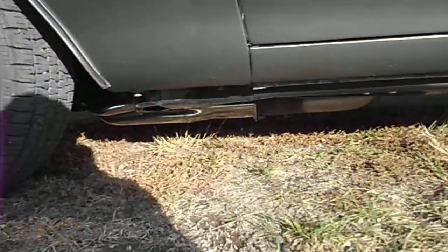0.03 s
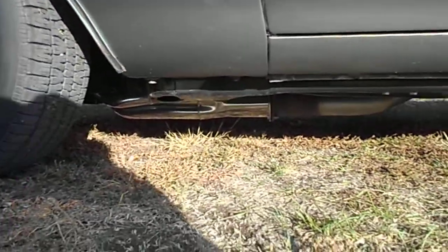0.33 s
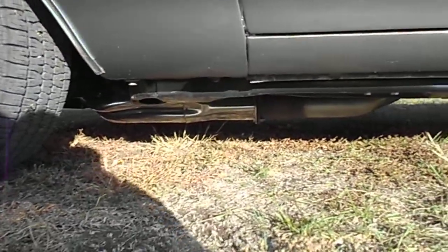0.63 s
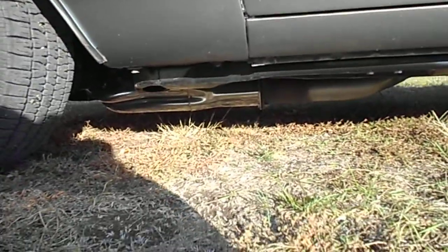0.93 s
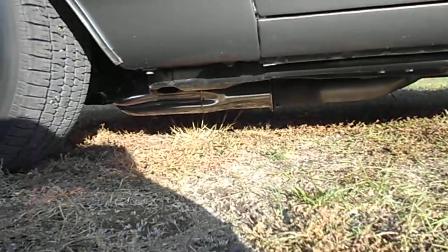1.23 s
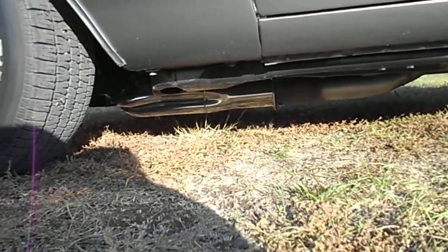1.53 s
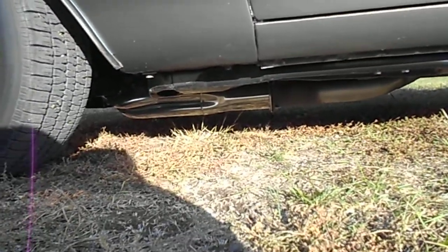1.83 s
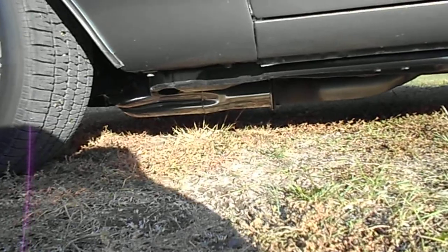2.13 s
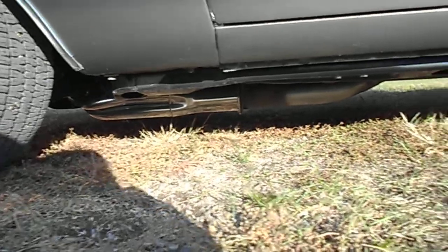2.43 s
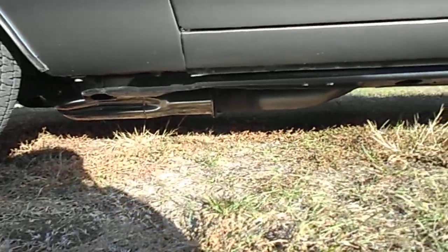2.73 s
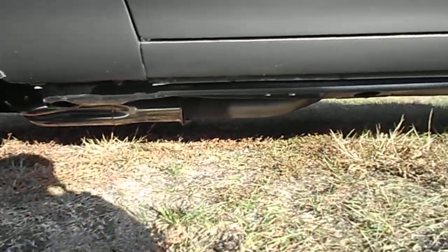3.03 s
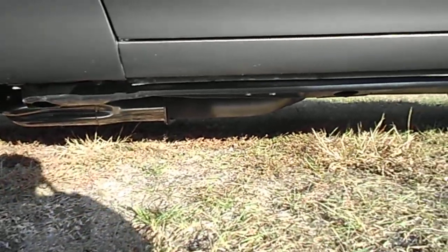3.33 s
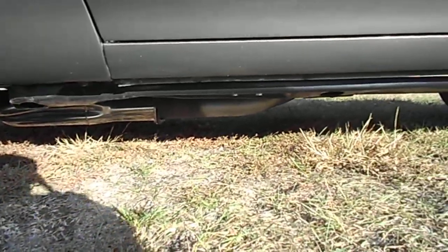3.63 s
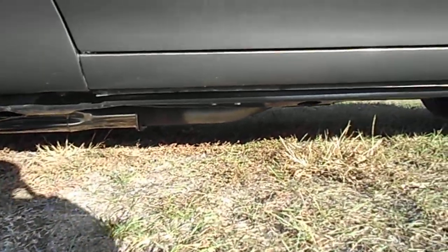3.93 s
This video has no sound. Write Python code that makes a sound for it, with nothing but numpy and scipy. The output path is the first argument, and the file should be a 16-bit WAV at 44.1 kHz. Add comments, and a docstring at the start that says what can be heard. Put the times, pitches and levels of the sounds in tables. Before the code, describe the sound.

A V8 car idles outdoors with a deep, lumpy beat, its exhaust close to the microphone. The pipe booms and burbles throughout over a low rumble, while loose thin metal rattles in short, sizzling bursts.

```python
"""A V8 car idles with a lumpy beat on grass, its side exhaust close to the microphone.
Uneven firings boom through the pipe, each with a puff of gas that burbles and rushes out.
Something of thin metal, probably a loose shield, rattles in short sizzling bursts as the
engine shakes, and now and then sings a note. A deep rumble swells under the car."""
import sys
import numpy as np
from scipy import signal
from scipy.io import wavfile
from scipy.ndimage import uniform_filter1d

SR = 44100
rng = np.random.default_rng(int(sys.argv[2]) if len(sys.argv) > 2 else 0)


def transcribe(signal):
    """Save signal, clipped to [-1, 1], as a 16-bit WAV file at the path in sys.argv[1]."""
    frames = np.atleast_2d(signal).T
    limited = np.clip(frames, -1, 1)
    pcm = np.round(limited * 32767).astype(np.int16)
    wavfile.write(sys.argv[1], SR, pcm)


N = 176400  # 4 seconds


def amp(db):
    """Turns decibels into a gain."""
    return 10 ** (np.asarray(db) / 20)


def unit(x):
    """Scales a sound to an average (rms) level of 1."""
    return x / np.sqrt(np.mean(x ** 2) + 1e-20)


def curve(table):
    """Joins rows of (seconds, value) with straight lines, giving a value for every sample."""
    times, values = np.transpose(table)
    return np.interp(np.arange(N) / SR, times, values)


def colour(x, points):
    """Shapes the tone with a filter that follows rows of (Hz, dB)."""
    hz, db = np.transpose(points)
    bins_hz = abs(np.fft.fftfreq(16384, 1 / SR))
    log_gain = np.log(amp(np.interp(np.log(bins_hz + 1), np.log(hz), db)))
    taps = np.fft.ifft(np.exp(np.conj(signal.hilbert(log_gain)))).real  # rings only after a hit
    return signal.fftconvolve(x, taps[:len(taps) // 2])[:N]


def with_modes(x, modes):
    """Adds ringing tones (resonances) to a sound, from rows of (Hz, width in Hz, dB)."""
    out = x
    for hz, width, db in modes:
        decay = np.exp(-np.pi * width / SR)
        pole = decay * np.exp(2j * np.pi * hz / SR)
        out = out + 2 * amp(db) * signal.lfilter([1 - decay], [1, -pole], x).real
    return out


def resonate(x, hz, width_hz):
    """One resonance whose pitch follows the curve hz."""
    turn = np.exp(2j * np.pi * np.cumsum(hz) / SR)
    decay = np.exp(-np.pi * width_hz / SR)
    return 2 * (turn * signal.lfilter([1 - decay], [1, -decay], x / turn)).real


def steadied(x, samples):
    """Evens out slow drift in loudness, so that a level curve can set it."""
    window = np.hanning(samples)
    local_power = abs(signal.fftconvolve(x ** 2, window / window.sum(), "same"))
    return x / np.sqrt(local_power + np.mean(x ** 2) / 20)


# The tone of the rumble. Each row: frequency in Hz, gain in dB.
RUMBLE_TONE = [(15, -37), (36, -20.5), (48, -5.5), (58, -4.5), (80, -5), (130, -27), (400, -64.5)]
# The swells of the rumble. Each row: time in seconds, level in dB.
RUMBLE_SWELLS = [(0, -27), (1.0, -31.5), (1.95, -24.5), (2.13, -38), (2.29, -24.5), (2.36, -32),
                 (3.15, -31), (3.4, -30), (3.53, -42.5), (3.7, -22.5), (3.8, -33.5)]
def rumble():
    """Deep noise swells and sinks under the car."""
    noise = colour(rng.standard_normal(N), RUMBLE_TONE)
    return steadied(noise, samples=6000) * amp(curve(RUMBLE_SWELLS))


# The jolts that rattle the metal. Each row: start in seconds, strength in dB.
JOLTS = [(0.0094, -40), (0.0648, -37.5), (0.1694, -29), (0.224, -30.5), (0.4675, -37.5), (0.4907, -38.5),
         (0.577, -33), (0.588, -31), (0.6412, -36.5), (0.6757, -36.5), (0.9087, -34.5), (0.928, -33.5),
         (0.974, -37), (1.009, -29.5), (1.13, -37), (1.1837, -37), (1.201, -29), (1.287, -38.5),
         (1.377, -34.5), (1.418, -38), (1.472, -36.5), (1.491, -29.5), (1.532, -38), (1.5811, -29),
         (1.619, -35), (1.6727, -31.5), (1.7144, -36), (1.762, -38.5), (1.7814, -26), (1.866, -28.5),
         (1.897, -31), (1.95, -30.5), (2.186, -38), (2.2048, -32), (2.2635, -39.5), (2.297, -29.5),
         (2.335, -31.5), (2.38, -32.5), (2.4773, -34), (2.5955, -36.5), (2.699, -33), (2.7901, -36.5),
         (2.8983, -29), (3.02, -34.5), (3.0749, -38), (3.1294, -30.5), (3.302, -33.5), (3.349, -34),
         (3.4, -37.5), (3.6377, -40), (3.68, -37.5), (3.692, -35), (3.7298, -35), (3.759, -36.5)]
def shaking():
    """How hard the metal shakes: a faint buzz, a burst at each jolt, and small random spits."""
    rise_s, hold_s, burst_fall_s, buzz_db = 0.0014, 0.0095, 0.019, -49.5
    spits_per_s, spit_db, spit_fall_s = 31, -39.5, 0.0082
    age = np.arange(SR // 4) / SR
    rise = np.minimum(age / rise_s, 1)
    burst = rise * np.exp(-np.maximum(age - hold_s, 0) / burst_fall_s)
    spit = amp(spit_db) * rise * np.exp(-age / spit_fall_s)
    kicks = np.zeros(N)
    for start, db in JOLTS:
        kicks[round(start * SR)] = amp(db)
    touches = (rng.random(N) < spits_per_s / SR).astype(float)
    power = signal.fftconvolve(kicks ** 2, burst ** 2) + signal.fftconvolve(touches, spit ** 2)
    return np.sqrt(amp(buzz_db) ** 2 + abs(power[:N]))


# The notes the loose metal sings. Each row: start in seconds, pitch in Hz, level in dB.
METAL_NOTES = [(0.586, 3200, -55), (1.475, 2470, -58), (1.578, 3150, -48.5), (1.869, 3950, -54),
               (3.135, 3600, -54)]
def metal_chirps():
    """Some jolts make the metal sing: a rough note that slides up and rings out."""
    bend, roughness = 0.11, 0.013  # as fractions of the pitch
    rise_s, fade_60_db_s = 0.0043, 0.31
    age = np.arange(SR // 4) / SR
    settling = np.exp(-age / rise_s)
    out = np.zeros(N)
    for start, hz, db in METAL_NOTES:
        waver = roughness * unit(uniform_filter1d(rng.standard_normal(len(age)), size=100))
        turns = np.cumsum(hz * (1 - bend * settling + waver)) / SR
        note = amp(db - 60 * age / fade_60_db_s) * (1 - settling) * np.sin(2 * np.pi * turns)
        out[round(start * SR):][:len(age)] += note
    return out


# The tone of the metal's bright sizzle. Each row: frequency in Hz, gain in dB.
SIZZLE_TONE = [(2500, -36), (4500, -31), (6500, -20), (8200, -11.5), (9300, -1), (10100, 2.5), (10600, 1),
               (11500, -7.5), (12200, -37)]
# The tone of its lower, longer ring. Each row: frequency in Hz, gain in dB.
RING_TONE = [(1000, -6.5), (1700, -5.5), (2000, -18.5), (2400, -2.5), (2800, -8.5), (3500, -1.5),
             (5000, -12.5), (8000, -9)]
# Its clearest ringing tones. Each row: frequency in Hz, width in Hz, strength in dB.
METAL_MODES = [(2216, 15, 10.5), (2452, 20, 4.5), (3190, 68, 3.5), (3573, 50, 7)]
def metal_rattle(shake):
    """Tiny metal ticks make a bright sizzle and strike a lower, dense ring that lingers."""
    chatter_hz, chatter_depth, ticks_per_s, spread_db = 58.1, 0.12, 4600, 1.5
    sizzle_db, ring_db, fade_60_db_s = -8.5, -18.5, 0.18
    speed = curve(ENGINE_PITCH)  # the chatter speeds up and slows down with the engine
    turns = np.cumsum(chatter_hz * speed / speed.mean()) / SR
    force = shake * unit(np.exp(chatter_depth * (1 - 2 * (turns % 1))))
    ticks = (rng.random(N) < ticks_per_s / SR) * rng.choice([-1, 1], N)
    tick_sizes = amp(spread_db * np.clip(rng.standard_normal(N), -2, 2))
    hits = unit(ticks * tick_sizes) * force
    sizzle = unit(colour(hits, SIZZLE_TONE))
    strike = force ** 1.17  # hard jolts ring the metal more than in proportion
    decay = np.exp(-2 * np.log(1000) / (fade_60_db_s * SR))
    energy = signal.lfilter([1], [1, -decay], strike ** 2)
    lingering = unit(np.sqrt(energy) * rng.standard_normal(N))
    ring = unit(with_modes(colour(0.6 * unit(hits) + lingering, RING_TONE), METAL_MODES))
    return hits.std() * (amp(sizzle_db) * sizzle + amp(ring_db) * ring)


# The tones the pipe rings at. Each row: frequency in Hz, width in Hz, strength in dB.
STANDING_WAVES = [(212, 14.3, 0.5), (293.8, 13.6, 7), (411, 42, -3), (483, 11, 10), (569, 29, -1),
                  (932, 21, -2.5)]
def pipe(x, tone):
    """Gives a sound its tone, then adds the ring of waves bouncing inside the exhaust pipe."""
    return with_modes(colour(x, tone), STANDING_WAVES)


# The tone of the rush. Each row: frequency in Hz, gain in dB.
RUSH_TONE = [(150, -34.5), (350, -2.5), (480, 0), (620, 0), (730, -8), (860, -5), (1040, -4), (1400, -18),
             (2000, -23), (6000, -39.5)]
# How loud the rush is. Each row: time in seconds, level in dB.
RUSH_SWELLS = [(0, -43), (1.1, -45.5), (1.8, -43), (2.1, -46), (2.33, -44), (2.6, -47.5), (4, -45.5)]
def outlet_rush(flow):
    """Gas leaves the end of the pipe with a fairly steady rush."""
    noise = pipe(flow * rng.standard_normal(N), RUSH_TONE)
    return unit(noise) * amp(curve(RUSH_SWELLS))


# The tone of the burble. Each row: frequency in Hz, gain in dB.
BURBLE_TONE = [(50, -31), (110, -4.5), (170, 8.5), (260, -2), (340, -10), (480, -14.5), (2000, -67.5)]
# How loud the burble is. Each row: time in seconds, level in dB.
BURBLE_SWELLS = [(0.02, -31), (0.1, -36), (0.2, -29), (0.36, -37.5), (0.5, -30), (0.92, -35.5),
                 (1.04, -27.5), (1.22, -33.5), (1.27, -26.5), (1.38, -31), (1.59, -30), (1.66, -23.5),
                 (1.78, -33.5), (1.89, -27.5), (2.15, -35.5), (2.36, -27.5), (2.64, -39.5), (2.73, -32.5),
                 (3.4, -36), (3.68, -30), (3.98, -36)]
def gas_burble(flow):
    """Puffing gas makes a low, throaty noise in the pipe."""
    noise = pipe(flow * rng.standard_normal(N), BURBLE_TONE)
    return steadied(noise, samples=4500) * amp(curve(BURBLE_SWELLS))


def gas_flow(bangs):
    """Each firing adds a quickly fading puff to a steady stream of gas."""
    stream, puff_s = 1.83, 0.0097
    puffs = signal.lfilter([1], [1, -np.exp(-1 / (puff_s * SR))], bangs)
    return stream + unit(puffs)


# The eight cylinders in firing order. Each number: strength in dB.
CYLINDER_STRENGTHS = [-1, -3.5, -4, -2, -1.5, 2.5, -6.5, 1]
# The pitch of the boom, two cycles for each firing. Each row: time in seconds, pitch in Hz.
ENGINE_PITCH = [(0, 97.98), (1.25, 104), (1.8, 106.7), (2.0, 99.02), (3.25, 97.39), (4, 101.8)]
def firings():
    """One sharp bang per firing: each cylinder has its own strength, and no two burns are alike."""
    uneven_db, jitter_s = 3.5, 0.0015
    count = np.floor(np.cumsum(curve(ENGINE_PITCH) / 2) / SR)
    due = np.flatnonzero(np.diff(count, prepend=-1))
    late, strong = rng.standard_normal((len(due), 2)).T
    starts = np.clip(due + (late * jitter_s * SR).astype(int), 0, N - 1)
    bangs = np.zeros(N)
    bangs[starts] = amp(np.resize(CYLINDER_STRENGTHS, len(due)) + uneven_db * np.clip(strong, -2, 2))
    return bangs


# The tone of the boom. Each row: frequency in Hz, gain in dB.
BOOM_TONE = [(30, -26.5), (46, -13), (65, -11), (85, 0), (102, -0.5), (125, 3), (160, -9), (205, -13.5),
             (250, -28), (350, -30), (1200, -85.5)]
# The lumpy rise and fall of the idle. Each row: time in seconds, relative level in dB.
BOOM_SWELLS = [(0.02, -29), (0.2, -23), (0.33, -27.5), (0.6, -23.5), (0.71, -29), (0.76, -21), (0.86, -29),
               (1.07, -21.5), (1.11, -53), (1.14, -32), (1.33, -23.5), (1.35, -32), (1.74, -23.5),
               (1.79, -34.5), (1.96, -17), (2.04, -31), (2.07, -23), (2.18, -32), (2.38, -20),
               (2.42, -32.5), (2.49, -20), (2.61, -28), (3.11, -24.5), (3.145, -20), (3.26, -30.5),
               (3.39, -19), (3.59, -30.5), (3.7, -23), (3.77, -31), (3.86, -20.5), (3.98, -30)]
def exhaust_boom(bangs, shake):
    """Firings boom through the pipe at a wavering pitch, harder just after each jolt."""
    gain_db, note_db, surge_db, lag_s = 1.18, 5, 6, 0.0038
    t = np.arange(N) / SR
    jolt = np.interp(t - lag_s, t, uniform_filter1d(shake, size=900))
    level_db = gain_db + curve(BOOM_SWELLS) + surge_db * (jolt - jolt.mean()) / jolt.max()
    note = resonate(colour(bangs, BOOM_TONE), curve(ENGINE_PITCH), width_hz=22.8)
    boom = pipe(bangs, BOOM_TONE) + amp(note_db) * note
    return steadied(boom, samples=4000) * amp(level_db)


def scene():
    """Exhaust and loose metal in the open air, both moved by the same jolts of the engine."""
    shake = shaking()
    bangs = firings()
    flow = gas_flow(bangs)
    exhaust = exhaust_boom(bangs, shake) + gas_burble(flow) + outlet_rush(flow)
    return (exhaust + rumble() + metal_rattle(shake) + metal_chirps())[None]


# Dips in the microphone's treble. Each row: frequency in Hz, width in Hz.
TREBLE_DIPS = [(5500, 2610), (11025, 720)]
def record(dry):
    """Cuts the deepest bass, makes two dips in the treble, fades the ends and cuts the top treble."""
    low_cut_hz, high_cut_hz, fade_s = 23.7, 12250, 0.006
    out = signal.sosfilt(signal.butter(2, low_cut_hz, "high", fs=SR, output="sos"), dry)
    for hz, width in TREBLE_DIPS:
        out = signal.lfilter(*signal.iirnotch(hz, hz / width, SR), out)
    out = out * signal.windows.tukey(N, 2 * fade_s * SR / N)
    high_cut = signal.firwin(401, high_cut_hz, window=("kaiser", 9), fs=SR)
    return signal.oaconvolve(out, high_cut[None], "same")


dry = scene()
out = record(dry)
transcribe(out)
```